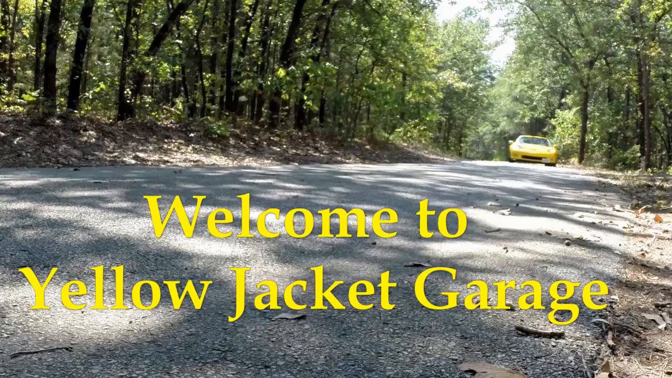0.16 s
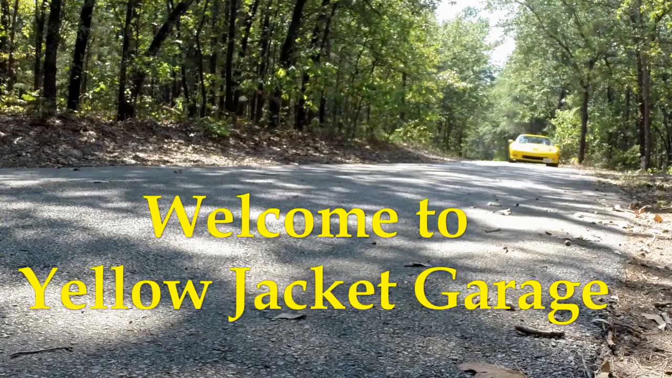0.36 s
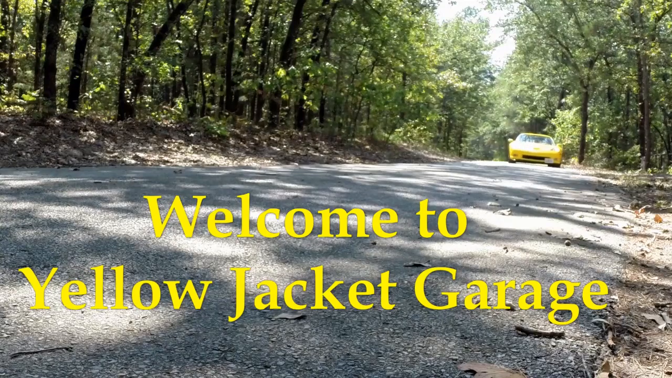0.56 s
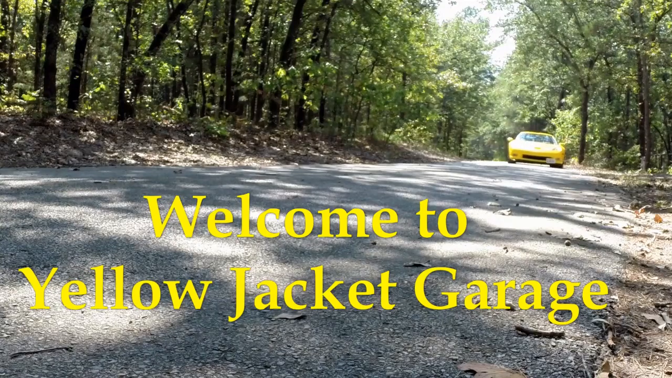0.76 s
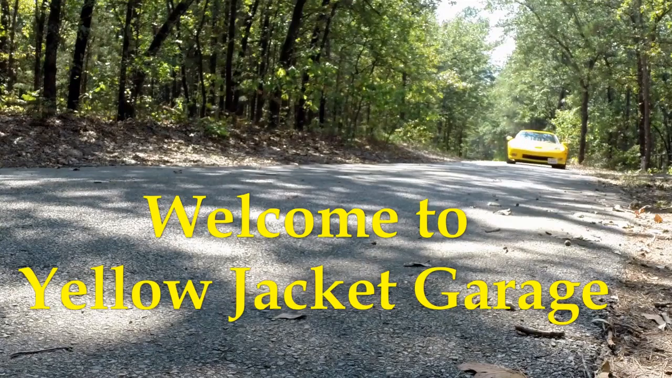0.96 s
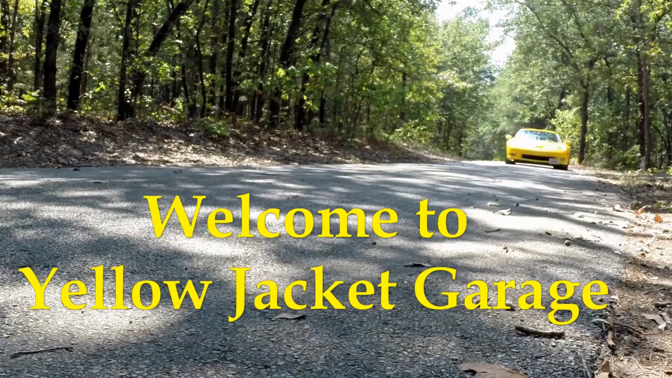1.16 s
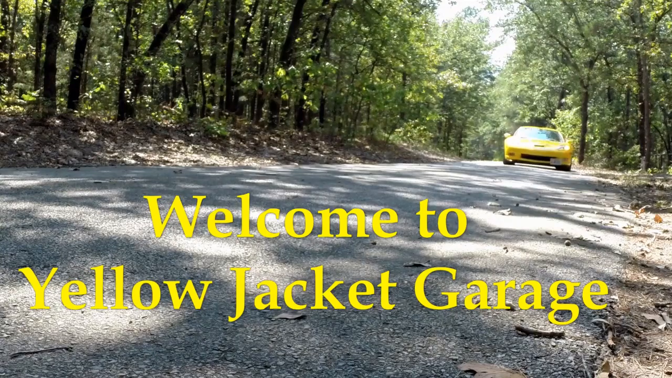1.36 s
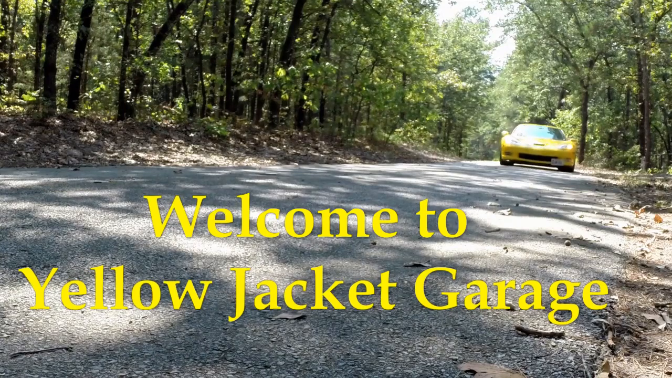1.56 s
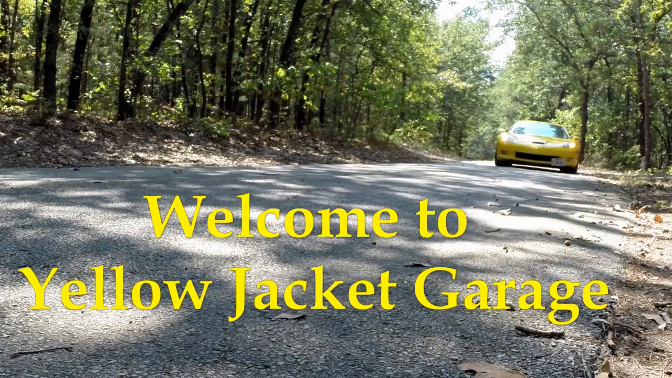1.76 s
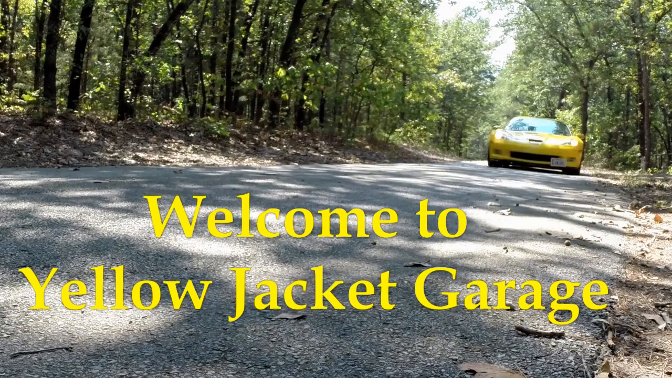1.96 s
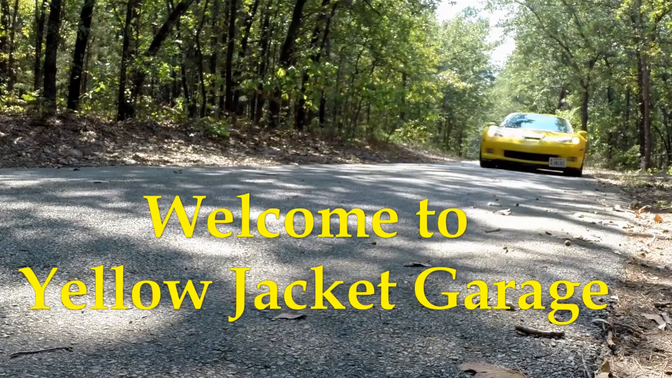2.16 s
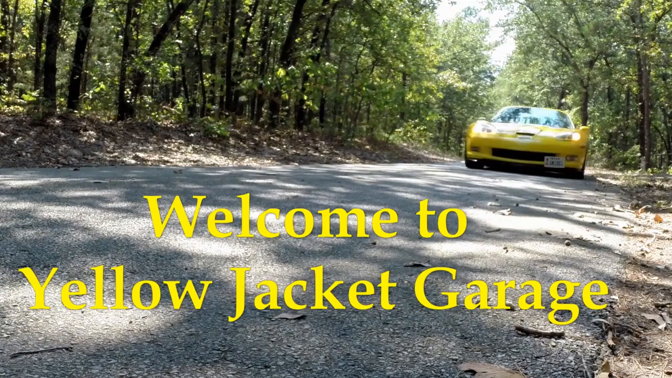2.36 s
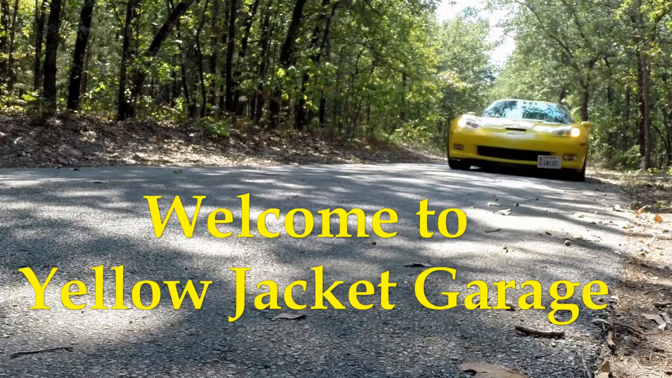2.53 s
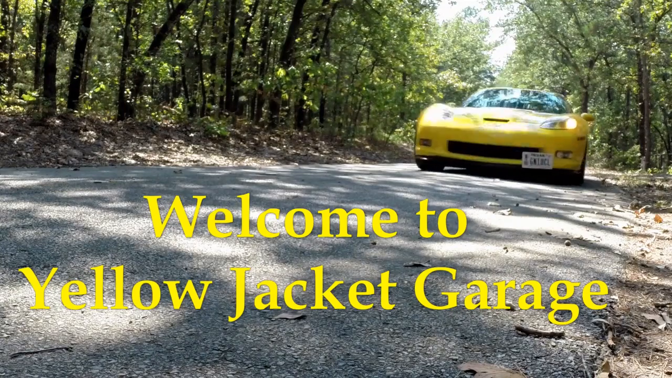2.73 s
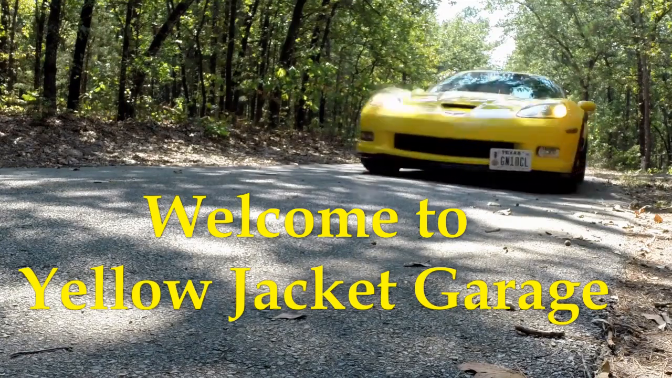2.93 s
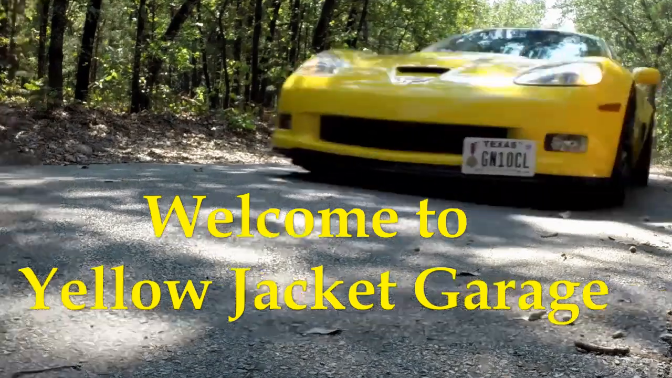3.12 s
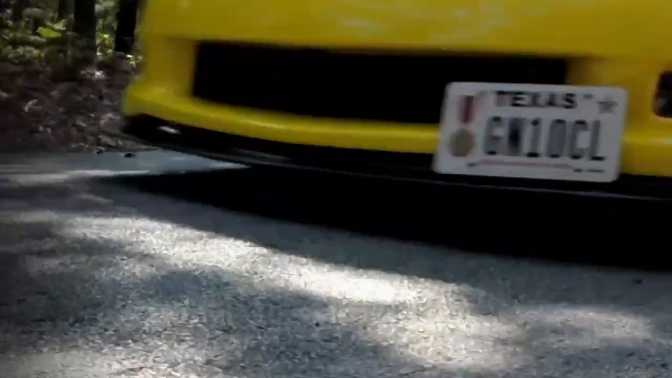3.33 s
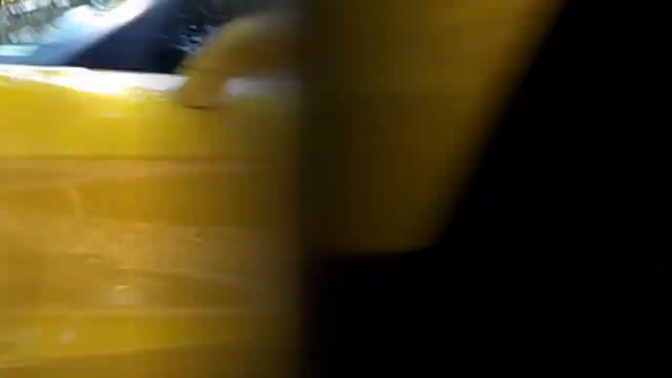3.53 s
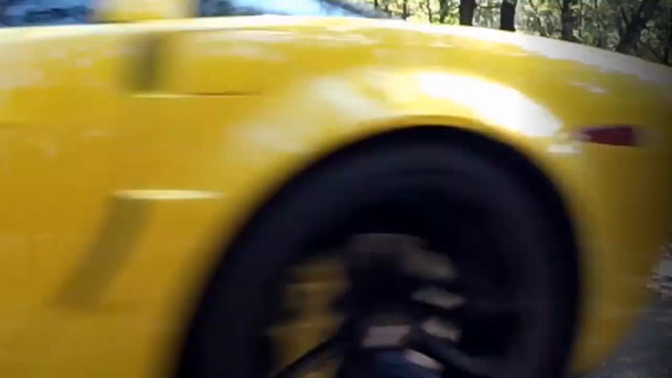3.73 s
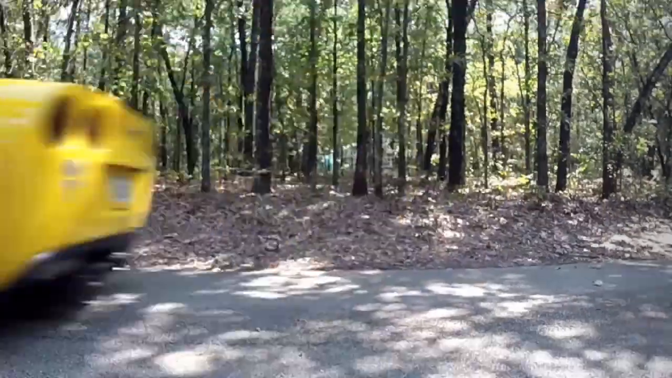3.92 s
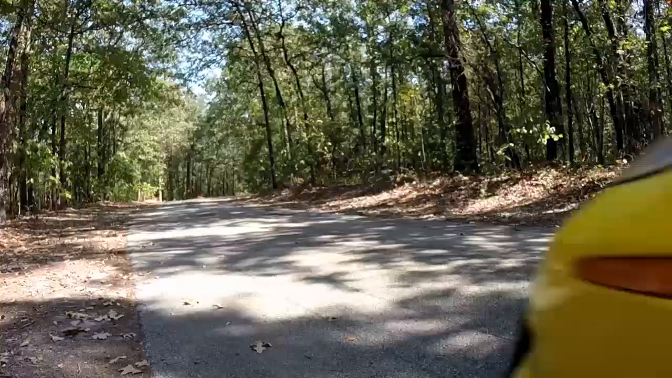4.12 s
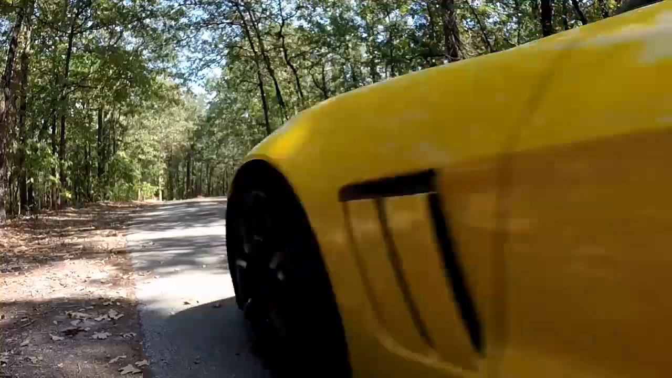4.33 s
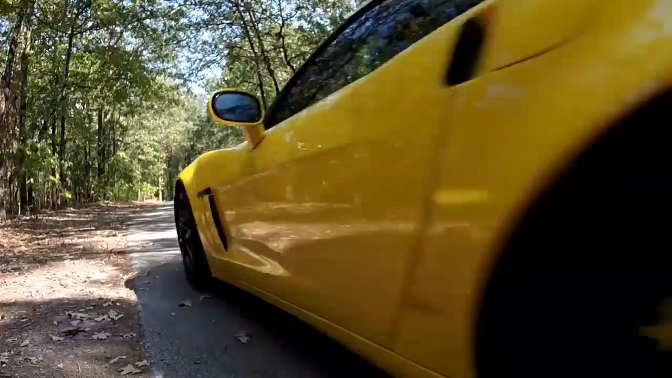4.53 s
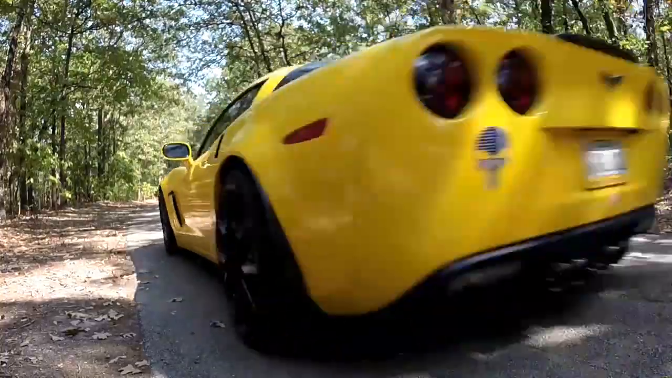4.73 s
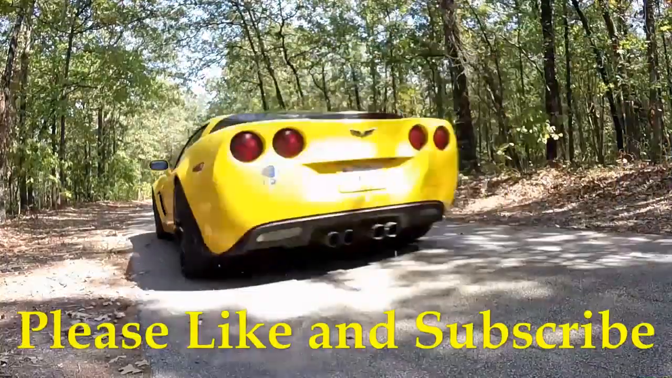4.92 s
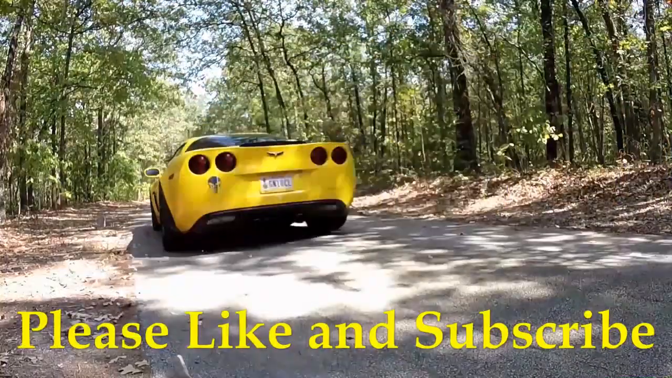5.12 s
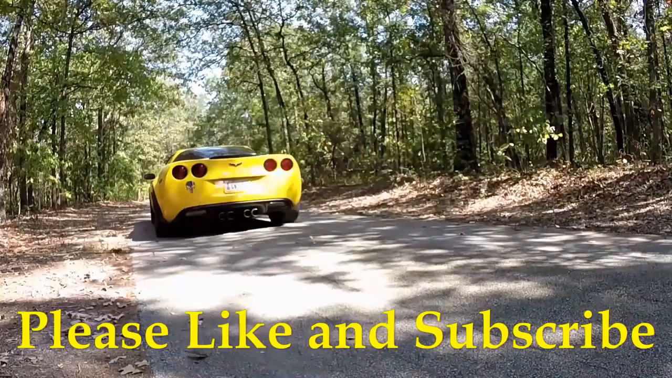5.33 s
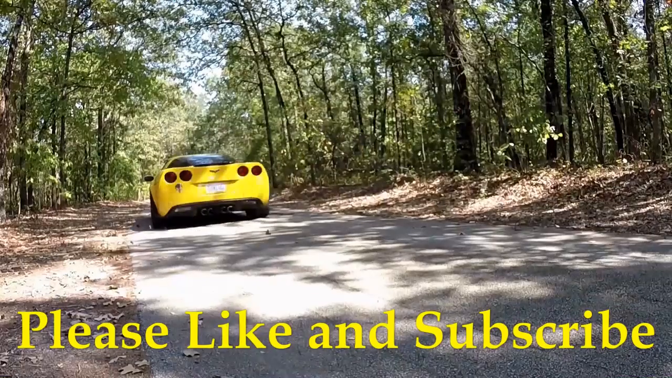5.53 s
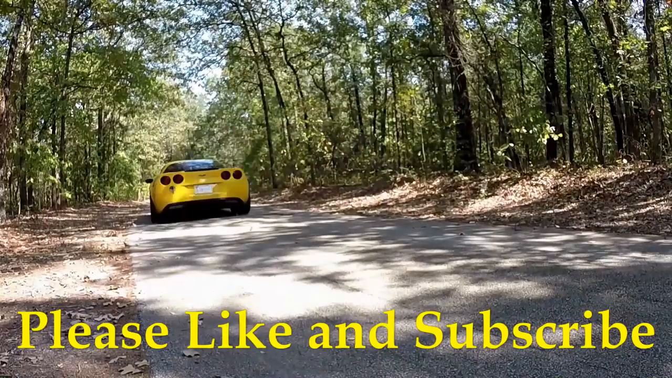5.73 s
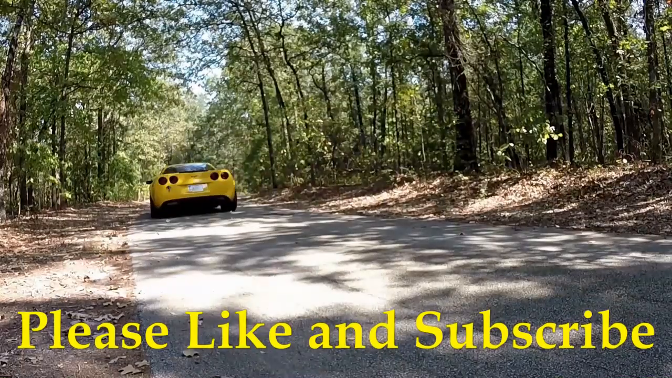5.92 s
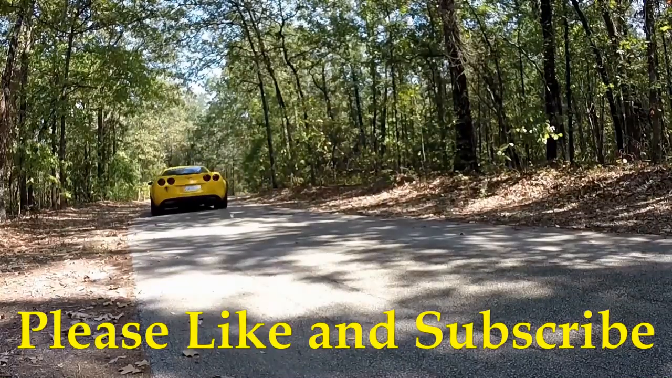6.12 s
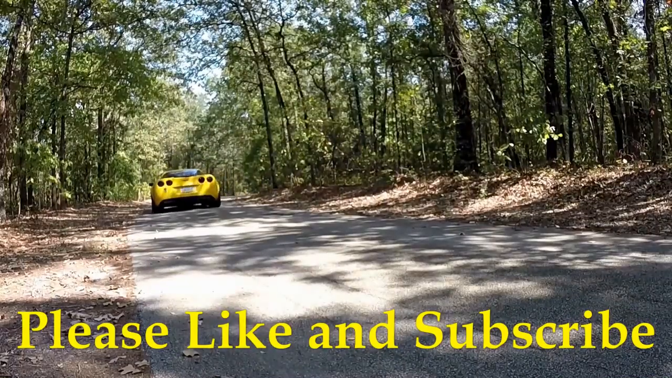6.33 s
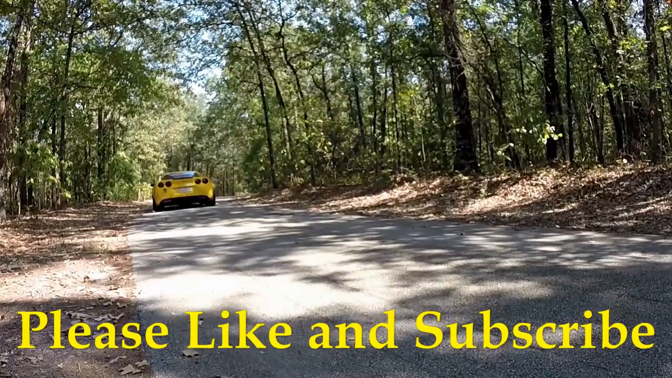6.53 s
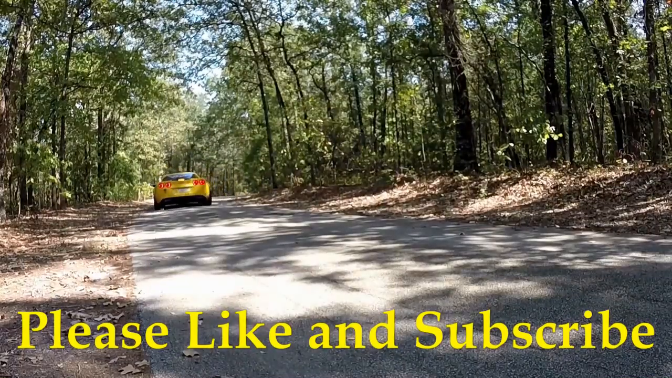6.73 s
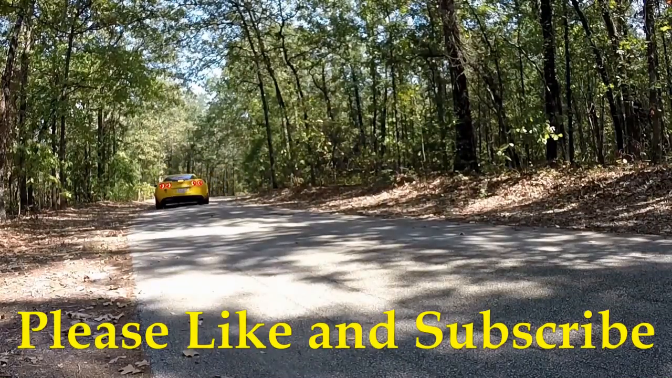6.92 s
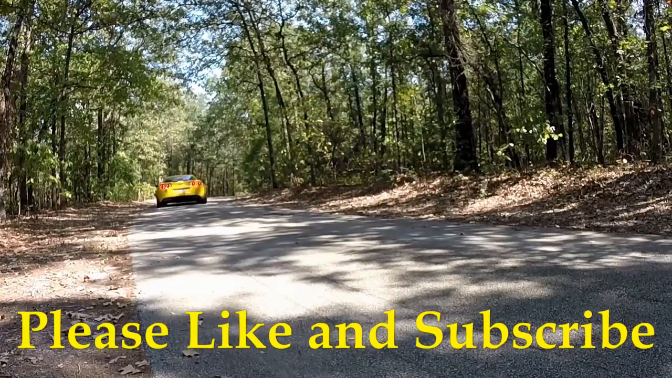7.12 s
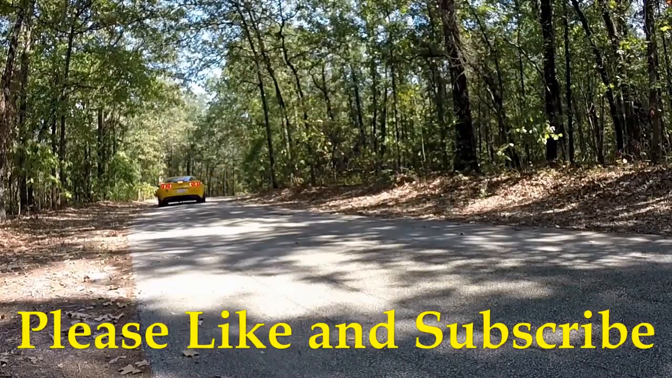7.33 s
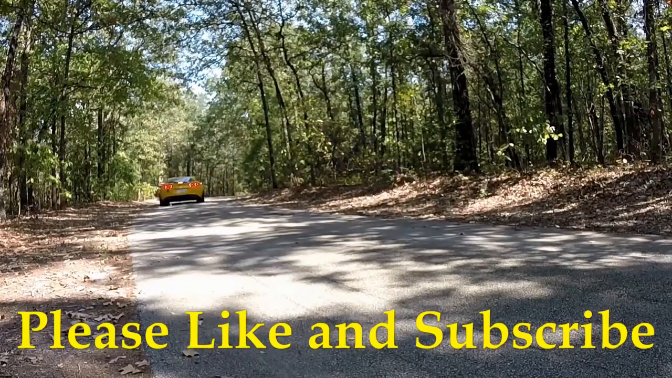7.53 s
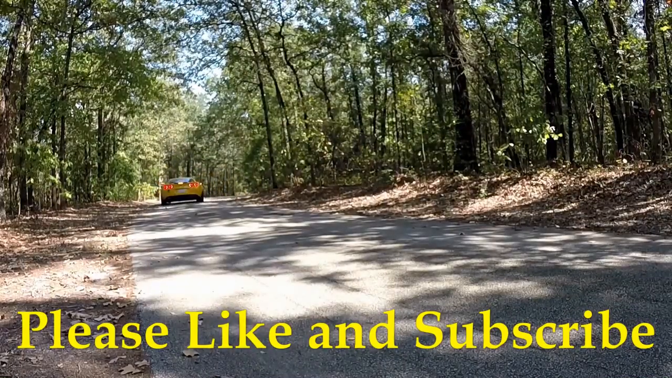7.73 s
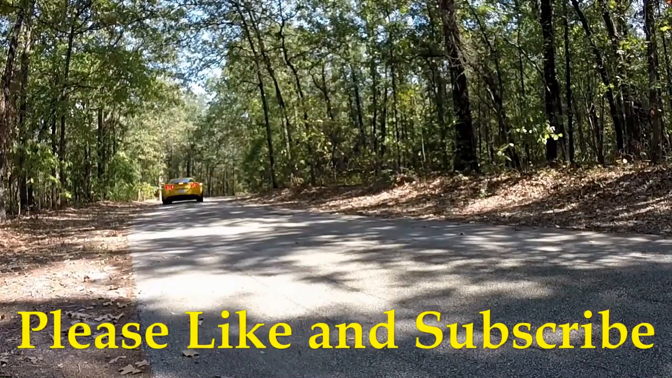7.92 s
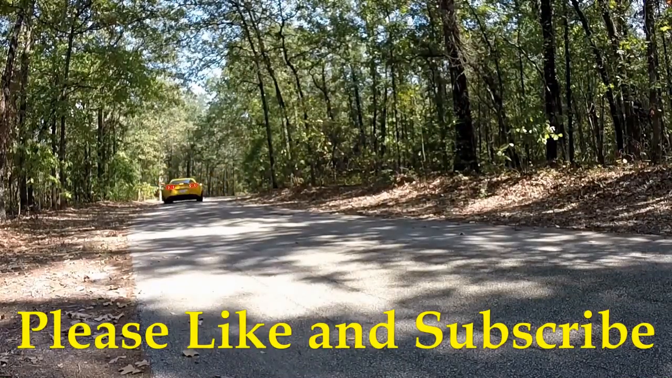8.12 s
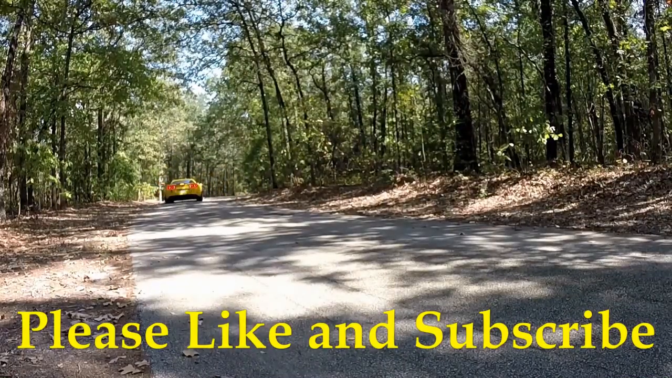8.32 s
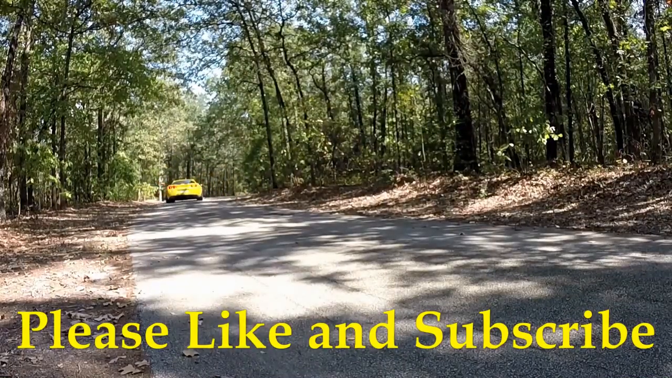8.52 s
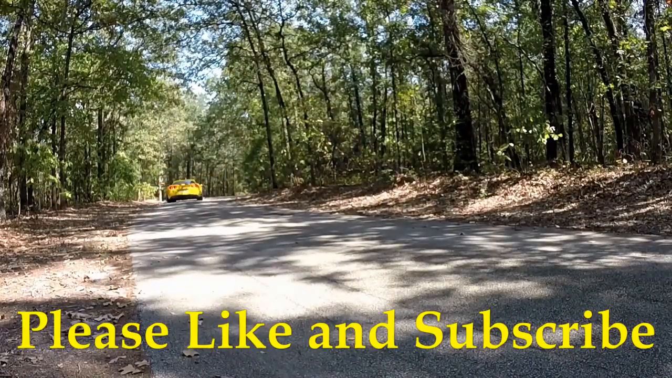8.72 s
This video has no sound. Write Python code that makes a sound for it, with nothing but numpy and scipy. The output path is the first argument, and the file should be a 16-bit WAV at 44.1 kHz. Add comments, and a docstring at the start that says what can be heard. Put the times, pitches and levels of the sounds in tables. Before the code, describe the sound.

A V8 sports car drones toward a roadside microphone in a forest, its throbbing engine rising in pitch. The revs flare as it draws level, and it sweeps past very close with a rush of tyres and a few ticks of flicked stones. Then the pitch falls as it moves away, the exhaust rasping, burbling and popping. Gusts of air buffet the microphone, and the trees add a short echo.

```python
"""A V8 sports car drones along a forest road toward a listener, in a faint breeze and rustling leaves. Its
pipes boom where the engine speed meets their resonances, and uneven firings rumble and rasp. The tyres swell
and flick stones, and near 4 s the revs flare as the car draws level. Just after 4.2 s the scene changes: the
car sweeps by within arm's reach, trailing gusts of air, then from 5 s burbles and pops away off the throttle.
All along, the trees scatter the sound back."""
import sys
import numpy as np
from scipy import signal
from scipy.fft import rfft, irfft, next_fast_len
from scipy.io import wavfile
from scipy.ndimage import uniform_filter1d, minimum_filter1d

SR = 44100
rng = np.random.default_rng(int(sys.argv[2]) if len(sys.argv) > 2 else 0)


def log_audio(samples):
    """Write samples as a 16-bit WAV file to the path given in sys.argv[1]."""
    # one column per channel
    frames = np.atleast_2d(samples).T
    # limit to full scale, then quantise
    limited = np.clip(frames, -1, 1)
    pcm = np.round(limited * 32767).astype(np.int16)
    wavfile.write(sys.argv[1], SR, pcm)


N = 386757
TIME = np.arange(N) / SR
BEHIND = np.interp(TIME, [3.3, 4.25], [0, 1])  # 0 while we hear the car's front, 1 once we hear its tail
BREAKUP_DB = 6  # behind the car, ragged firing trades clean throbbing tones for rumble

# strength of each of the eight firings in one engine cycle: level/dB
CYLINDER_DB = [-2.5, -2.5, 1, -1.5, -5, 0.5, -1.5, 0.5]
# how unevenly the cylinders fire, worst off the throttle: t/s, raggedness/0-1
RAGGEDNESS = [(1, .2), (3.1, .28), (3.5, .48), (4.1, .42), (4.4, .22), (5, .25), (5.8, .72), (6.5, .8),
              (6.85, .45), (7.6, .52), (8.2, .8)]
# tone of the tailpipes' rasp: f/Hz, relative level/dB
RASP_TONE = [(150, -24), (310, -10.5), (375, -17.5), (420, 3), (470, 3.5), (520, 1.5), (585, 8), (630, 0.5),
             (695, 9), (740, 5.5), (780, 6), (825, -2), (910, -1), (1000, -14), (1090, -29.5),
             (1180, -12.5), (1300, -20), (1600, -27.5), (4000, -75), (10000, -110)]
# tone of a thump in the silencers: f/Hz, relative level/dB
THUMP_TONE = [(30, -51), (70, -13.5), (110, -6), (145, -1), (175, 9.5), (215, 1.5), (260, -16),
              (400, -31.5), (1000, -73), (6000, -130)]
# pops in the exhaust: t/s, thud peak/dB, bark peak/dB
POP_EVENTS = [(5.117, -11.5, -21), (5.232, -23.5, -23), (5.365, -16, -20), (5.454, -7.5, -22),
              (5.47, -19, -16.5), (6.031, -20, -24), (6.059, -12, -25), (6.151, -19, -19),
              (6.183, -20, -31), (6.433, -17, -29), (6.572, -18, -16.5), (6.701, -18, -18.5),
              (6.728, -12, -21), (6.752, -13, -21.5), (7.003, -22, -19.5), (7.094, -22.5, -17.5),
              (7.207, -12, -21), (7.311, -12.5, -24), (7.723, -21, -26), (7.801, -18.5, -22.5),
              (8.0, -22, -28), (8.17, -16.5, -37), (8.26, -13, -27.5), (8.312, -19, -27), (8.362, -15, -35),
              (8.465, -16, -28)]


def undb(db):
    """Turn decibels into a gain to multiply by."""
    return 10 ** (np.asarray(db) / 20)


def curves(table):
    """Turn each column of a timed table into one value per sample."""
    times, *columns = np.transpose(table)
    return [np.interp(TIME, times, column) for column in columns]


def unit(x):
    """Scale a sound to an average (rms) level of 1."""
    return x / np.sqrt(np.mean(x ** 2))


def even(x):
    """Hold the slow level at 1 but keep the fast flutter."""
    return x / np.sqrt(uniform_filter1d(x ** 2, size=8000) + 1e-12)


def wander(per_s):
    """A smooth random wobble, about 1 in size, that picks per_s new values a second."""
    hold = int(SR / per_s)
    steps = np.repeat(rng.standard_normal(N // hold + 1), hold)
    return 1.3 * uniform_filter1d(uniform_filter1d(steps, hold), hold)[:N]


def colour(x, tone, size=4096):
    """Pass a sound through a ringing body with the given tone (f/Hz, level/dB)."""
    hz, db = np.transpose(tone)
    bins = np.maximum(np.arange(size // 2 + 1) * SR / size, 1)
    gains = undb(np.interp(np.log(bins), np.log(hz), db))
    cepstrum = irfft(np.log(gains))
    # folding this in half makes the body ring only after it is struck
    cepstrum[1:size // 2] *= 2
    cepstrum[size // 2 + 1:] = 0
    return signal.oaconvolve(x, irfft(np.exp(rfft(cepstrum))))[:N]


def facing(x, tone_ahead, tone_behind):
    """Blend from the tone of the car's front to that of its tail as it passes."""
    front, tail = unit(colour(x, tone_ahead)), unit(colour(x, tone_behind))
    return even(np.sqrt(1 - BEHIND) * front + np.sqrt(BEHIND) * tail)


def turning(ahead_db, behind_db, behind=BEHIND):
    """Slide a level from its value ahead of the car to its value behind."""
    return ahead_db + behind * (behind_db - ahead_db)


def nearness(at_s, rise_s, fade_s):
    """One over the distance of something going by: 1 at its closest."""
    return 1 / np.hypot(1, (TIME - at_s) / np.where(TIME < at_s, rise_s, fade_s))


def forest(x, echo_db, spread, count=4, decay_s=0.53):
    """Add a fading wash of echoes off the trunks, drifting among count random patterns."""
    t = TIME[:SR // 2]
    fade = undb(-60 * t / decay_s) * (1 - np.exp(-t / 0.061))
    patterns = [fade * rng.standard_normal(len(t)) for _ in range(count + 1)]
    side, *washes = (signal.oaconvolve(x, pattern)[:N] / np.linalg.norm(fade) for pattern in patterns)
    shares = np.array([wander(3) for _ in washes])
    mid = (shares * washes).sum(axis=0) / np.linalg.norm(shares, axis=0)
    echoes = mid + spread * side * np.array([[1], [-1]])
    return (x + undb(echo_db) * echoes) / np.sqrt(1 + undb(2 * echo_db))


def pipe_boost(hz):
    """How much the pipes boost a pure tone, in dB from ahead and from behind."""
    # the pipes' resonances: f/Hz, level ahead/dB, level behind/dB
    resonances = [(75, -4, -4.5), (93.9, 4.5, 1.5), (104.3, 7.5, -5.5), (118, 2.5, -4.5), (150, -4, -7.5),
                  (177, -4, -2.5), (195, -10, 0.5), (234.6, 1.5, -1.5), (238.15, 3, -8), (268.5, -8, -8.5),
                  (300, -5, -4.5), (386, -2, -12.5), (449.4, -1, -24)]
    points_hz, *sides = np.transpose(resonances)
    return [np.interp(np.log(hz), np.log(points_hz), db) for db in sides]


def lope(angle, hz, level_db, ragged):
    """The two rows of cylinders beat against each other in a rolling throb."""
    # tones of the throb: multiple of the engine cycle, level ahead/dB, level behind/dB
    tones = [(4, -16, -17.5), (5, 1, -13), (6, 3.5, 0), (7, 4, -7.5), (9, -19, -14.5), (10, 7.5, 0),
             (11, -2, -2), (12, -20, -16.5), (13, -7.5, -8.5), (14, -1.5, -3), (15, -13.5, -23),
             (17, -18.5, -16.5), (18, -20, -12.5), (20, -18.5, -15)]
    cylinders = len(CYLINDER_DB)
    waver_db, strongest_hz, width_octaves = .3 + 3 * ragged, 142.3, 0.24
    throb = 0
    for multiple, ahead_db, behind_db in tones:
        _, boom_db = pipe_boost(multiple * hz / cylinders)
        gain = undb(turning(ahead_db, behind_db) + BEHIND * boom_db + waver_db * wander(13))
        # the pipes delay each tone differently, so the sum throbs instead of knocking
        shift = 3 * np.pi / 10 * (multiple - cylinders) ** 2
        throb = throb + gain * np.sin(multiple * angle / cylinders + shift)
    beating = np.hypot(1, np.log2(hz / strongest_hz) / width_octaves) ** -1.57
    lope_db = level_db + turning(0, 1.5) - BREAKUP_DB * BEHIND * (ragged - .5)
    return undb(lope_db) * beating * even(throb)


def drone(firings, hz, level_db, ragged):
    """Firings blur into a note with overtones and a throb, lumpier when the engine runs ragged."""
    # the octave above the note fades whenever the throttle shuts: t/s, relative level/dB
    octave_levels = [(.6, -1), (1.2, 1), (3.5, -.5), (3.95, 3), (4.03, -4.5), (4.2, -5), (4.6, -4),
                     (4.9, 1), (5.5, -3), (6.5, -7), (6.8, .5), (7.2, 0), (7.9, -3.5), (8.4, -6)]
    level_db = level_db + 2.4 * ragged * BEHIND * wander(26)
    angle = 2 * np.pi * (firings + (.008 + .018 * ragged) * wander(40))
    note_db = level_db + turning(*pipe_boost(hz))
    note = undb(note_db + (.4 + 2 * ragged) * wander(30)) * np.sin(angle)
    octave_db = level_db + turning(-6.5, 0) + turning(*pipe_boost(2 * hz)) + curves(octave_levels)[0]
    octave_gain = undb(octave_db + (1.2 + ragged) * wander(35))
    octave = octave_gain * np.sin(2 * angle + rng.uniform(0, 2 * np.pi) + .65 * ragged * wander(70))
    # the silencers let higher overtones through only at low revs, fading them above 103 firings a second
    leak_db = -21 - 33.5 * np.maximum(np.log2(hz / 103), 0)
    leak_gain = undb(note_db + leak_db + 2 * wander(30))
    overtones = leak_gain * (np.sin(3 * angle) + undb(-9.5) * np.sin(4 * angle))
    return np.sqrt(2) * (note + octave + overtones) + lope(angle, hz, level_db, ragged)


def firing_samples(firings):
    """The samples at which a cylinder fires."""
    return np.flatnonzero(np.diff(np.floor(firings)))


def exhaust_pulses(firings, scatter_db, steady, gas):
    """Each firing sends out a pulse of its own strength, with a puff of swirling gas behind it."""
    at = firing_samples(firings)
    strength = undb(np.resize(CYLINDER_DB, len(at)) + scatter_db * rng.standard_normal(len(at)))
    pulses = np.zeros(N)
    pulses[at] = strength - (1 - steady) * strength.mean()  # a low steady leaves mostly the unevenness
    puff = np.interp(TIME, at / SR, strength) * np.exp(-(firings % 1) / 0.73) * rng.standard_normal(N)
    return unit(pulses) + gas * unit(puff)


def rumble(firings, level_db, ragged):
    """Uneven pulses boom in the silencers; the car's body shields the sound until it is close."""
    # tone of the boom: f/Hz, relative level/dB
    boom_tone = [(25, -39.5), (55, -14.5), (90, -2.5), (130, -4), (175, 3.5), (220, -3), (290, -6),
                 (360, -17), (500, -18.5), (1000, -84.5), (6000, -130)]
    boom = even(colour(exhaust_pulses(firings, scatter_db=2, steady=.1, gas=1.0), boom_tone))
    unshielded = np.interp(TIME, [2.3, 3.34], [0, 1])
    rumble_db = level_db + turning(-12, -3, unshielded) + BREAKUP_DB * BEHIND * (ragged - .5)
    return forest(boom, echo_db=-17, spread=0) * undb(rumble_db)


def rasp(firings, rasp_db, ragged):
    """Blasts of gas, some early and some late, growl from the front and rasp from the tailpipes."""
    # tone of the growl: f/Hz, relative level/dB
    growl_tone = [(150, -37.5), (320, 0), (400, 3.5), (505, -5.5), (555, -5), (590, 5), (630, 0), (700, 1),
                  (820, 0), (950, -3.5), (1100, -6), (1600, -15), (4000, -69), (10000, -94)]
    blasts = exhaust_pulses(firings + .12 * ragged * wander(150), scatter_db=1, steady=.7, gas=2.6)
    throb_db = .8 * np.sin(2 * np.pi * 2 * firings / len(CYLINDER_DB))  # once per crankshaft turn
    gap_s, gap_db = .008, -4  # the blast before each pop fails, leaving a dip
    gaps = sum(np.exp(-np.minimum(np.abs((TIME - at_s) / gap_s + 1), 10) ** 2) for at_s, *_ in POP_EVENTS)
    sound = forest(facing(blasts, growl_tone, RASP_TONE), echo_db=-6.5, spread=0.08)
    return sound * undb(rasp_db + throb_db + gap_db * gaps)


def tailpipe_ring(firings, hz, rasp_db, ragged):
    """Two overtones sing as they cross the tailpipes' resonance, most when the engine runs evenly."""
    # the resonance: f/Hz, width/Hz, level ahead/dB, level behind/dB (both added to the rasp's level)
    resonance = (592, 35, -14, -7.5)
    centre_hz, width_hz, ahead_db, behind_db = resonance
    tones = 0
    for multiple in (3, 4):
        tone = np.sin(2 * np.pi * multiple * firings + .5 * wander(40))
        tones = tones + tone / np.hypot(1, (multiple * hz - centre_hz) / width_hz)
    return np.sqrt(2) * tones * undb(rasp_db + turning(ahead_db, behind_db)) * (1 - ragged)


def gritty_noise(tone, cracks_per_s, grit):
    """Smooth noise mixed with tiny cracks: many faint, a few strong."""
    smooth = rng.standard_normal(N)
    cracks = (rng.random(N) < cracks_per_s / SR) * rng.standard_normal(N)
    cracks *= undb(3.5 * np.minimum(rng.exponential(size=N), 3))
    return unit(colour(smooth + grit * unit(cracks), tone))


def tyre_gains():
    """Roar, hiss and spray swell as the wheels come near; the higher sounds die sooner with distance."""
    # the approach, drawing level, front wheel, rear wheel and going away:
    # loudest t/s, rise/s, fade/s, roar level/dB, hiss level/dB, spray level/dB
    swells = [(3.2, 0.47, 0.36, -40.5, -56.5, -62), (3.88, 0.35, 0.076, -34, -45, -48.5),
              (4.386, 0.11, 0.089, -22, -33.5, -41.5), (4.65, 1, 0.11, -52, -42.5, -39),
              (6.72, 0.47, 1.05, -41, -56.5, -81.5)]
    handover_s = (4.18, 4.262)  # the scene changes here, to the car passing close by
    second_pass = np.interp(TIME, handover_s, [0, 1])
    power = 0
    for at_s, rise_s, fade_s, roar_db, hiss_db, spray_db in swells:
        near = nearness(at_s, rise_s, fade_s)
        gains = np.array([undb(roar_db) * near, undb(hiss_db) * near**1.07, undb(spray_db) * near**2.58])
        share = second_pass ** 2 if at_s > handover_s[0] else 1 - second_pass
        power = power + (gains * share) ** 2
    return np.sqrt(power)


def tyres():
    """The tread roars, hisses and sprays fine grit, and the sound also bounces off the road."""
    # tones of the roar (from ahead and behind), the hiss and the spray: f/Hz, relative level/dB
    roar_ahead = [(200, -10), (500, 5), (900, -0.5), (1250, -1.5), (1450, 1.5), (1630, -3.5), (1870, 1.5),
                  (2150, -1.5), (2580, 3), (3000, -0.5), (3600, -3.5), (4500, -8.5), (7000, -49),
                  (12000, -58)]
    roar_behind = [(200, -9.5), (500, 9), (900, 7), (1250, 2), (1750, 0), (2150, 2), (2700, -1),
                   (3500, -3.5), (4500, -11), (7000, -34), (12000, -53)]
    hiss_tone = [(2000, -22), (3500, 7.5), (4300, 6), (5500, 7.5), (7000, -0.5), (8500, -12.5),
                 (13000, -73.5)]
    spray_tone = [(4000, -28), (7000, 12.5), (8200, 10), (10800, 6.5), (12300, -1), (14000, -17.5)]
    # the bounce weakens one band, which climbs as the car leaves: t/s, f/Hz, strength/0-1
    road_bounce = [(4.6, 1085, 0), (4.95, 1427, 0), (5.35, 2132, 0.5), (5.7, 3252, 0.38), (6.2, 4973, 0)]
    roar_gain, hiss_gain, spray_gain = tyre_gains()
    roar = facing(rng.standard_normal(N), roar_ahead, roar_behind) * undb(1.2 * wander(30))
    hiss = gritty_noise(hiss_tone, cracks_per_s=500, grit=.6) * undb(wander(25))
    spray = gritty_noise(spray_tone, cracks_per_s=600, grit=.6) * undb(1.5 * wander(20))
    direct = roar * roar_gain + hiss * hiss_gain + spray * spray_gain
    notch_hz, strength = curves(road_bounce)
    bounced = strength * np.interp(TIME - .5 / notch_hz, TIME, direct)  # half a wave late
    return forest(direct + bounced, echo_db=-17.5, spread=0.15)


def wind(breeze_db=-52, side_db=-33):
    """Over a faint breeze, air stirred by the car buffets the microphone, almost alike on both sides."""
    # gusts behind the car: t/s, width/s, level/dB
    gusts = [(3.3, 0.18, -32), (4.851, .2, -34.5), (6.051, 0.25, -41), (6.7, 0.19, -33), (7.3, .07, -33),
             (7.748, 0.22, -41.5), (8.4, 0.24, -41)]
    # tone of the buffeting: f/Hz, relative level/dB
    tone = [(10, -23.5), (25, -1.5), (45, -2.5), (80, -11), (250, -45.5), (800, -78.0), (8000, -130)]
    gain = undb(breeze_db) + sum(undb(db) * nearness(at_s, width, width) ** 2 for at_s, width, db in gusts)
    mid, side = (unit(colour(rng.standard_normal(N), tone)) for _ in range(2))
    return (mid + undb(side_db) * side * np.array([[1], [-1]])) * gain * undb(2 * wander(7.7))


def leaves():
    """Dry leaves rustle softly at the roadside, in small flurries."""
    # flurries: loudest t/s, rise/s, fade/s, level/dB
    flurries = [(.1, 0.19, 0.055, -70.5), (5.05, 0.14, 0.13, -57.5), (6.151, 0.11, .13, -55.5),
                (6.5, 0.12, 0.091, -59), (8.501, 0.52, .5, -63.5)]
    # tone of the rustle: f/Hz, relative level/dB
    rustle_tone = [(2000, -17), (4500, 2.5), (7000, -1), (9500, 1), (11000, -10), (13000, -43)]
    gain = sum(undb(db) * nearness(at_s, rise_s, fade_s) ** 2 for at_s, rise_s, fade_s, db in flurries)
    return gritty_noise(rustle_tone, cracks_per_s=120, grit=.25) * gain * undb(3.5 * wander(22))


def stones():
    """Each stone flicked by a tyre gives one dry, bright tick or a short scuff."""
    # flicked stones: t/s, peak level/dB, lowest f/Hz, highest f/Hz, decay/s
    flicks = [(2.206, -34, 2215, 7060, 0.0022), (2.344, -39, 2500, 7500, .001),
              (2.893, -28, 2024, 5860, .0025), (3.206, -30, 1960, 5000, .003),
              (3.372, -32, 3005, 7900, 0.0033), (3.457, -31, 3000, 8150, .003),
              (3.524, -31, 3000, 8900, 0.0028), (3.614, -39, 3500, 9000, .002),
              (4.435, -20.5, 4496, 8855, 0.0078), (4.8454, -13.5, 3197, 12100, 0.00088),
              (4.8456, -24, 3400, 5540, 0.0012), (5.456, -34, 3806, 5550, .0014),
              (6.196, -29, 2194, 7090, 0.0036), (6.501, -33, 3206, 6986, .002),
              (6.694, -32.5, 2993, 5995, .002), (7.29, -29.5, 888, 1870, 0.012)]
    out, t = np.zeros(N), TIME[:SR // 20]
    for at_s, db, low_hz, high_hz, decay_s in flicks:
        band = signal.butter(3, [low_hz, high_hz], "band", fs=SR, output="sos")
        tick = signal.sosfilt(band, rng.standard_normal(len(t)) * np.exp(-t / decay_s))
        out[int(at_s * SR):][:len(t)] += undb(db) * tick / np.abs(tick).max()
    return forest(out, echo_db=-44, spread=.4, count=1)


def burble(firings, level_db, ragged, late_share=.35, spread_db=6.5):
    """Off the throttle, stray firings burn late and thump the silencers, harder when running ragged."""
    at = firing_samples(firings)
    chance, weakness = rng.random((len(at), 2)).T
    thumps = np.zeros(N)
    thumps[at] = (chance < late_share) * undb(-spread_db * weakness)
    off_throttle = np.interp(TIME, [4.8, 5.4], [0, 1])
    return unit(colour(thumps, THUMP_TONE)) * undb(level_db - 1) * ragged * off_throttle


def pops(decay_s=.006):
    """Unburnt fuel goes off in the pipes: a thud in the silencers and a bark from the tailpipes."""
    out, t = np.zeros(N), TIME[:SR // 5]
    thud = colour(signal.unit_impulse(len(t)), THUMP_TONE)
    for at_s, thud_db, bark_db in POP_EVENTS:
        start = int(at_s * SR)
        bark = colour(rng.standard_normal(len(t)) * np.exp(-t / decay_s), RASP_TONE)
        pop = -undb(thud_db) * thud / np.abs(thud).max() + undb(bark_db) * bark / np.abs(bark).max()
        out[start:start + len(pop)] += pop[:N - start]
    return out


def scene():
    """The car, with its engine sounds timed by one count of firings, and the air and leaves around it."""
    # steady pull, flare of revs, coast away: t/s, firing rate/Hz, exhaust level/dB, rasp level/dB
    pull = [(0, 91.35, -23, -49), (.5, 103.7, -25.5, -48), (1, 119.5, -24.5, -44), (1.5, 133.1, -24.5, -44),
            (2.4, 145, -21.5, -41), (3, 149.7, -21.5, -36.5), (3.38, 146.4, -22.5, -35)]
    flare = [(3.5, 151.9, -17.5, -28), (3.649, 176, -18, -27.5), (3.819, 204.6, -18, -26),
             (3.92, 217.8, -18, -27), (4, 221.8, -17.5, -29.5), (4.079, 208.8, -22, -34.5),
             (4.13, 197.7, -17.5, -31.5), (4.204, 196.9, -18, -31.5)]
    coast = [(4.24, 143.6, -16.5, -27.5), (4.55, 148.4, -14.5, -26.5), (4.719, 144.7, -13.5, -23.5),
             (4.87, 141.5, -15, -35), (5.101, 139.4, -19, -29), (5.498, 134.7, -19, -28),
             (5.8, 132, -22, -28.5), (6.05, 128.2, -19, -29), (6.5, 120.3, -17.5, -27),
             (6.75, 117.7, -17, -25), (7.2, 108.5, -18, -28), (7.579, 98.56, -21.5, -30),
             (7.999, 88.63, -22.5, -33.5), (8.201, 81.5, -26, -33.5), (8.77, 73.8, -27.5, -37.5)]
    hz, level_db, rasp_db = curves(pull + flare + coast)
    ragged, = curves(RAGGEDNESS)
    firings = np.cumsum(hz) / SR  # how many firings so far
    engine = drone(firings, hz, level_db, ragged) + rumble(firings, level_db, ragged)
    engine += rasp(firings, rasp_db, ragged) + tailpipe_ring(firings, hz, rasp_db, ragged)
    return engine + tyres() + wind() + leaves() + stones() + burble(firings, level_db, ragged) + pops()


def record(dry, ceiling=.78, top_hz=14200):
    """The microphone hears the middle range louder on the right, ducks big peaks and cuts the top."""
    # balance of its two sides: f/Hz, left minus right level/dB
    balance = [(300, 0), (600, -.3), (800, -1.2), (1100, -2.9), (2200, -1.8), (4200, -1), (7600, -.2),
               (12000, 0)]
    hz, balance_db = np.transpose(balance)
    size = next_fast_len(N)
    bins = np.maximum(np.arange(size // 2 + 1) * SR / size, 1)
    lean_db = np.interp(np.log(bins), np.log(hz), balance_db) * np.array([[.5], [-.5]])
    stereo = irfft(rfft(dry, size) * undb(lean_db), size)[:, :N]
    gain = ceiling / np.maximum(np.abs(stereo).max(axis=0), ceiling)
    limited = stereo * uniform_filter1d(minimum_filter1d(gain, size=441), size=441)  # eased over 10 ms
    return signal.sosfilt(signal.ellip(8, .2, 70, top_hz, fs=SR, output="sos"), limited)


dry = scene()
out = record(dry)
log_audio(out)
```